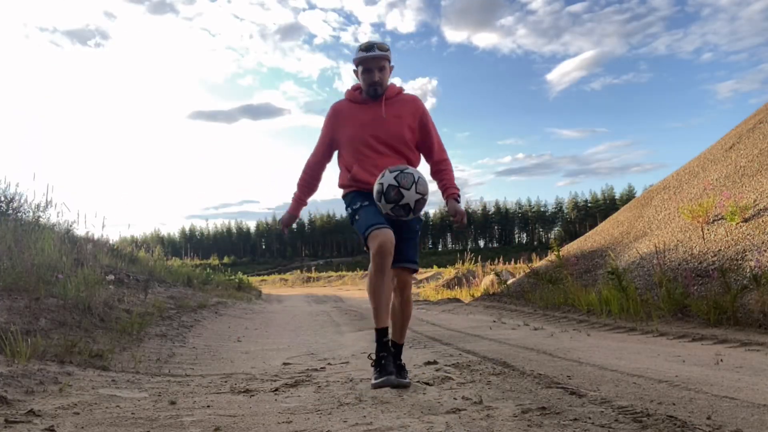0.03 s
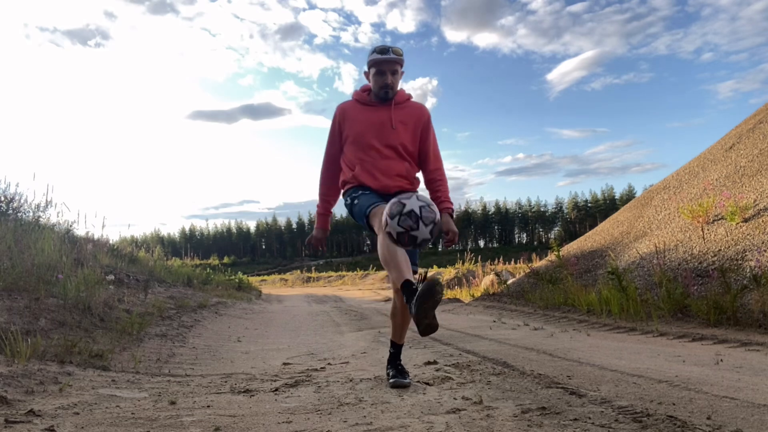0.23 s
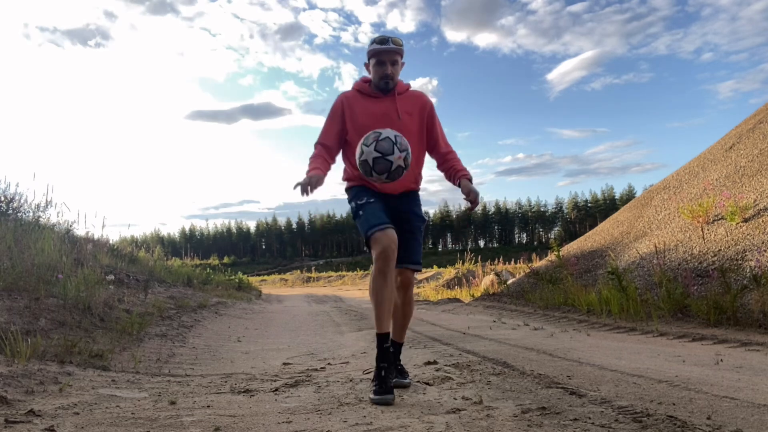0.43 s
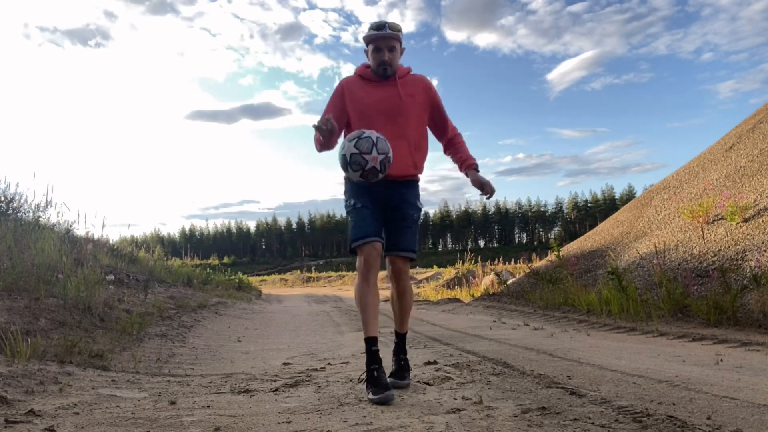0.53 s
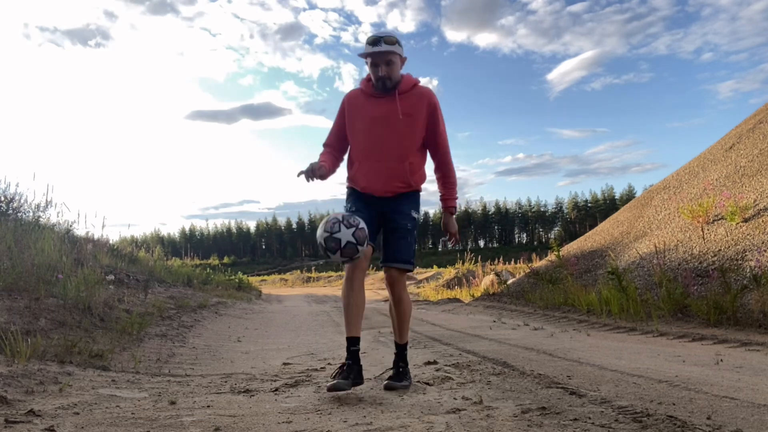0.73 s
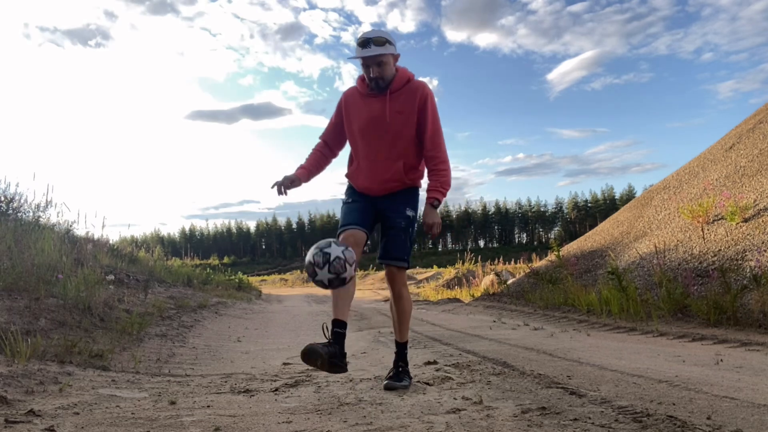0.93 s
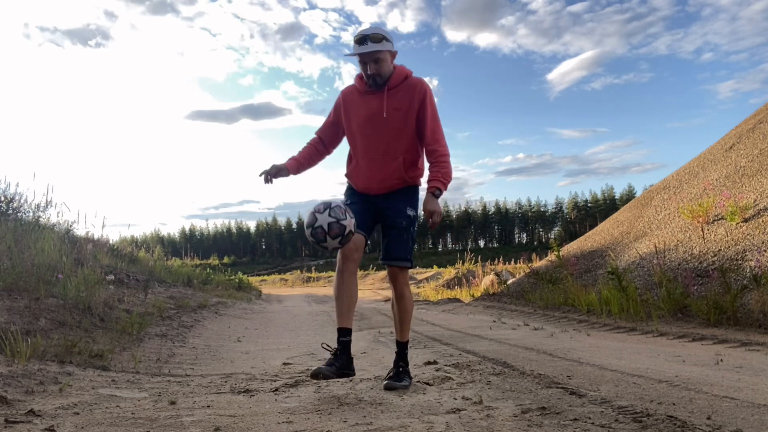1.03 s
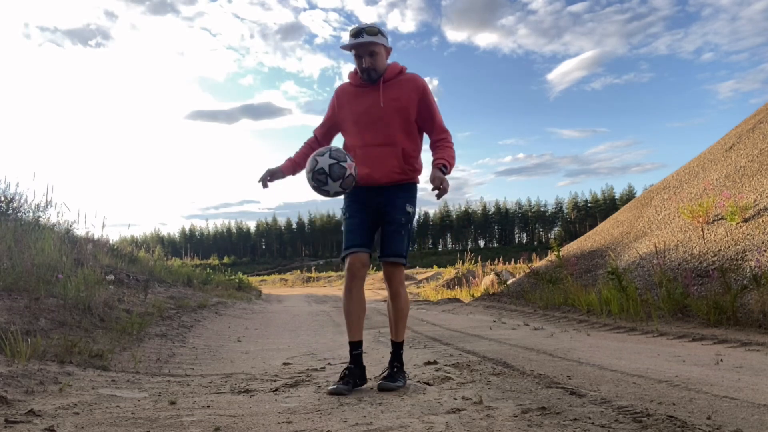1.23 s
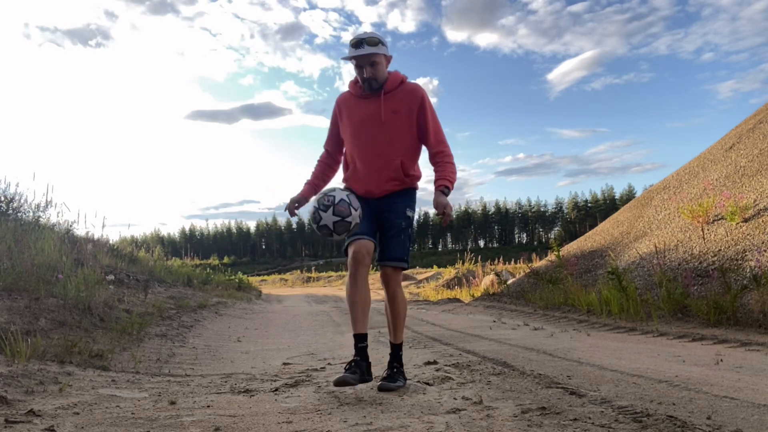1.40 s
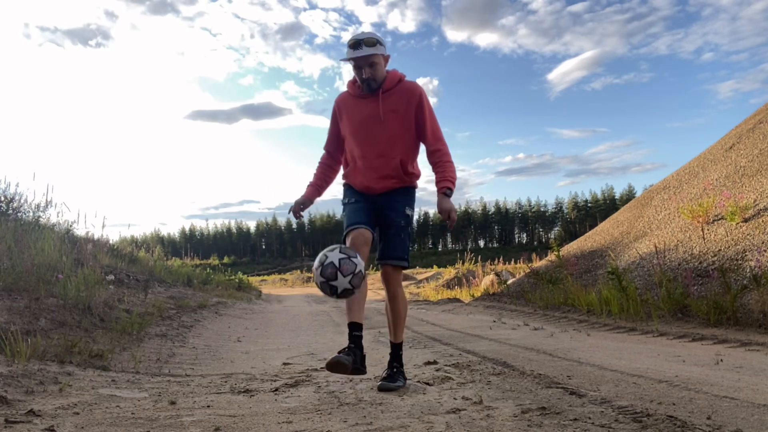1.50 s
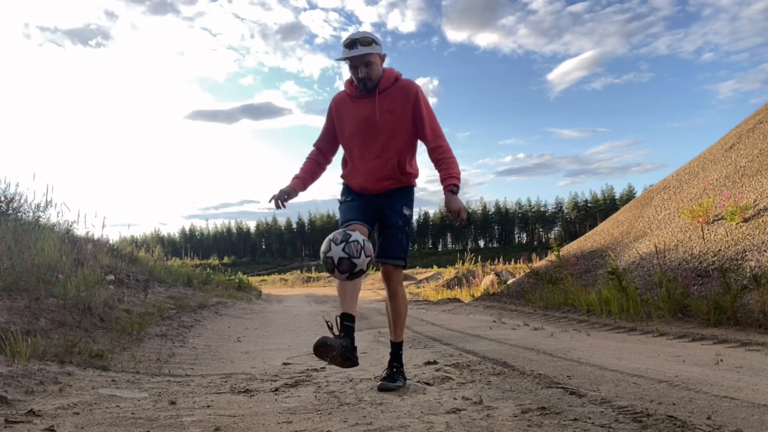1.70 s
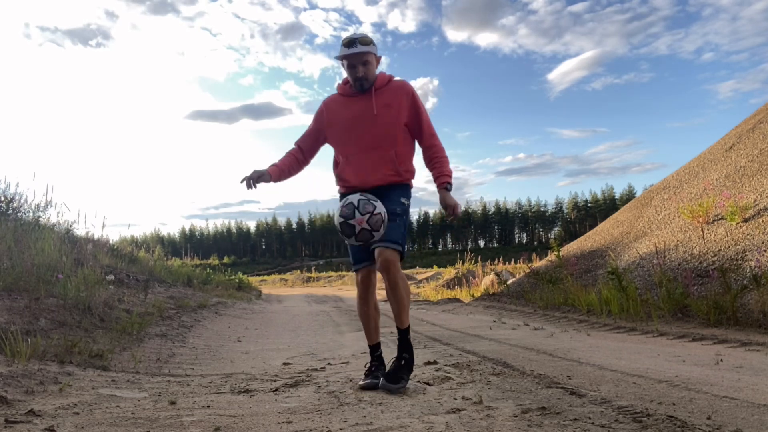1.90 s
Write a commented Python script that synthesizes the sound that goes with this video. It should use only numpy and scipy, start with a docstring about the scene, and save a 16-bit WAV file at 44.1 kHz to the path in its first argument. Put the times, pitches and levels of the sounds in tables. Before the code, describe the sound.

A football thumps five times at an uneven pace as someone juggles it on an open sandy track, a few metres from the microphone. Gritty shoe scuffs, sharp little taps and a tiny metallic jingle fall between touches, over faint wind.

```python
"""A sandy track in the open: a football is juggled on knees and shoes a few metres away.
Each touch slaps the cover and dents the ball: a knock, then heavily damped low modes that
come later the lower they are. Shoes scuff the sand and tap on stones, grit ticks and a small
metal piece jingles on the clothes, over light wind and a faint distant drone."""
import sys
import numpy as np
from scipy import signal
from scipy.fft import rfft, irfft
from scipy.io import wavfile

SR = 44100
rng = np.random.default_rng(int(sys.argv[2]) if len(sys.argv) > 2 else 0)


def file_out(sig):
    """Save sig as 16-bit WAV at sys.argv[1]."""
    # one column per channel
    cols = np.atleast_2d(sig).T
    # limit, then scale
    lim = np.clip(cols, -1, 1)
    pcm = np.round(lim * 32767).astype(np.int16)
    wavfile.write(sys.argv[1], SR, pcm)


N = 85995
T = np.arange(N) / SR
HZ = np.maximum(np.arange(N // 2 + 1) * SR / N, 1)


def amp(db):
    """Decibels to gain."""
    return 10 ** (np.asarray(db) / 20)


def unit(x):
    """Scale to rms 1."""
    return x / np.std(x)


def noise(spectrum, grain_db=0):
    """Noise shaped by (Hz, dB) points; grain_db makes it gritty."""
    hz, db = np.array(spectrum).T
    white = rng.standard_normal(N) * amp(grain_db * rng.standard_normal(N))
    gain = amp(np.interp(np.log(HZ), np.log(hz), db))
    return unit(irfft(rfft(white) * gain, N))


def band(hz, width_hz):
    """Noise in one steep resonance."""
    detune = (HZ - hz * hz / HZ) / width_hz
    return unit(irfft(rfft(rng.standard_normal(N)) / (1 + detune ** 2), N))


def drift(hz):
    """Smooth random motion below hz, rms 1."""
    return unit(irfft(rfft(rng.standard_normal(N)) / (1 + (HZ / hz) ** 4), N))


def highpass(x, hz, order):
    """Zero-phase high-pass."""
    return irfft(rfft(x) / (1 + (hz / HZ) ** order), N)


def age(start):
    """Seconds since start, zero before it."""
    return np.maximum(T - start, 0)


def swell(start, rise_s, fall_s, shape=1):
    """Attack and decay; a higher shape ends more abruptly."""
    t = age(start)
    return (1 - np.exp(-t / rise_s)) * np.exp(-(t / fall_s) ** shape)


def burst(source, envelope):
    """Enveloped noise, scaled to the energy of the envelope."""
    x = source * envelope
    return x * np.sqrt(np.sum(envelope ** 2) / (np.sum(x ** 2) + 1e-18))


def ring(modes, start):
    """Damped modes struck at start."""
    t = age(start)
    return sum(amp(db) * np.sin(2 * np.pi * hz * t) * np.exp(-np.log(1000) * t / t60_s)
               for hz, db, t60_s in modes)


# wind spectrum (frequency [Hz], relative density [dB])
WIND_SPECTRUM = [(25, -42), (45, -4), (70, -1.5), (130, 1), (280, -1), (520, -5.5), (900, -14.5),
                 (2000, -23.5), (5000, -25), (10000, -31), (16000, -39)]
# low rush of the wind (time [s], level [dB])
RUSH_LEVELS = [(0, -50), (.6, -80), (1.1, -61.5), (1.5, -54), (1.95, -47.5)]
def wind():
    """Light, near-steady wind and a low rush that fades, then slowly rises."""
    rush = amp(np.interp(T, *np.array(RUSH_LEVELS).T)) * band(570, width_hz=670)
    breeze = amp(-48.5 + 0.6 * drift(hz=6)) * noise(WIND_SPECTRUM)
    return breeze + rush


def drone():
    """Faint distant tone, wavering in pitch and level."""
    pitch_hz = 174.3 + 1.33 * drift(hz=3.47)
    rms_db = -55.5 + 1.5 * drift(hz=2.8)
    return amp(rms_db) * np.sqrt(2) * np.sin(2 * np.pi * np.cumsum(pitch_hz) / SR)


# shoe scuffs (peak time [s], level [dB], rise [s], fall [s])
SHOE_SCUFFS = [(.008, -42.5, 0.04, 0.026), (.085, -55.5, 0.028, 0.098), (.375, -52.5, 0.1, 0.034),
               (.475, -45, 0.016, 0.029), (0.563, -45.5, 0.029, 0.013), (.622, -34, 0.016, 0.0076),
               (0.678, -44.5, 0.019, 0.018), (0.786, -38.5, 0.02, 0.024), (1.251, -39.5, 0.015, 0.045),
               (1.363, -54.5, 0.028, .04), (1.790, -55.5, 0.032, 0.027), (1.865, -31.5, 0.016, 0.013),
               (1.918, -43.5, 0.031, 0.018)]
# sand spectrum (frequency [Hz], relative density [dB])
SAND_SPECTRUM = [(40, -38), (200, -4), (500, -10.5), (1250, -2), (2300, -5.5), (4500, -8), (8000, -13.5),
                 (12700, -22), (16000, -27)]
def scuffs():
    """Sand grains crunch as the shoes shift."""
    pressure = sum(amp(db) * np.exp(-np.maximum(peak - T, 0) / rise_s - age(peak) / fall_s)
                   for peak, db, rise_s, fall_s in SHOE_SCUFFS)
    return pressure * noise(SAND_SPECTRUM, grain_db=4) * amp(1.8 * drift(hz=330))


# metal contacts (time [s], level [dB], decay [s], brightness [dB])
METAL_CONTACTS = [(0.0563, -36.5, 0.0014, -7.5), (0.1354, -33.5, 0.0028, -5.5), (0.149, -41, 0.0015, 0),
                  (0.63, -63.5, 0.093, 7.5), (0.711, -52.5, 0.024, -12), (0.756, -42, 0.0043, 9),
                  (.7678, -28, 0.0014, -3), (0.7709, -17, 0.0032, -1), (0.776, -24, 0.003, -3),
                  (.7890, -33.5, 0.0052, 2), (0.814, -42, 0.0023, 0), (0.8254, -39.5, 0.0016, -7),
                  (1.235, -52, .001, -1), (1.3168, -34, 0.0049, -12), (1.3526, -42, 0.0023, -8),
                  (1.385, -45, 0.0026, -5)]
# scrape spectrum (frequency [Hz], relative density [dB])
SCRAPE_SPECTRUM = [(100, -45), (600, -50), (2200, 2), (4500, -5), (7000, 8.5), (10000, -6.5), (14000, -4.5),
                   (16000, -19)]
# metal modes, one list per column (frequency [Hz], gain [dB], t60 [s])
METAL_HZ = [6750, 6900, 7565, 7750, 8590, 11515, 12400, 13370, 13590, 13880]
METAL_DB = [-33, -27.5, -46, -26.5, -42, -36.5, -42, -37, -29, -25]
METAL_T60_S = [.045, .02, 0.018, 0.036, .03, 0.055, .045, 0.027, .04, 0.046]
def jingle():
    """Brief scraping contacts ring a small metal piece; some favour its highest modes."""
    scrape = noise(SCRAPE_SPECTRUM, grain_db=-5.5)
    treble = highpass(scrape, hz=9260, order=20)
    contact = 0
    for start, db, decay_s, bright_db in METAL_CONTACTS:
        low = burst(scrape - treble, swell(start, 0.00049, decay_s))
        high = burst(treble, swell(start, 0.00032, decay_s))
        contact += amp(db) * (low + amp(bright_db) * high) / np.sqrt(2)
    response = ring(zip(METAL_HZ, METAL_DB, METAL_T60_S), start=0)
    return amp(3.5) * contact + signal.fftconvolve(contact, response)[:N]


# taps of shoe and stones (time [s], body level [dB], resonance [Hz])
SHOE_TAPS = [(.0990, -34.5, 2310), (0.477, -26.5, 1960), (.7580, -27, 2160), (.7835, -26.5, 1400),
             (0.8155, -35, 1620), (0.928, -41, 3200), (1.0730, -34.5, 2480), (1.1331, -15, 2480),
             (1.1369, -18, 1160), (1.1585, -32, 2040), (1.2526, -26.5, 1700), (1.355, -34.5, 3300),
             (1.798, -34.5, 1410), (1.929, -30, 1190)]
def taps():
    """Dry taps: a short resonance and a bright crack that grows faster with force."""
    out, white = 0, rng.standard_normal(N)
    for start, db, hz in SHOE_TAPS:
        body = burst(band(hz, 0.97 * hz), swell(start, 0.0001, 0.0015))
        crack = burst(white, swell(start, 0.00005, 0.00057))
        out += amp(db) * body + amp(6.5 + 1.74 * db) * crack
    return out


def dent_mode(start, hz, swell_s, sag):
    """Heavily damped mode: swells, sinks from (1 + sag) * hz towards hz, dies in a few cycles."""
    t = age(start)
    cycles = hz * (t + sag * swell_s * (1 - np.exp(-t / swell_s)))
    envelope = t / swell_s * np.exp((1 - (t / swell_s) ** 2) / 2)
    return envelope * np.sin(2 * np.pi * cycles)


# ball touches (time [s], dent lag [s], thump [dB], body [dB], upper body [dB], body stretch [ratio],
#   knock [Hz], knock [dB], knock swell [s], clap [Hz], clap [dB],
#   slap [dB], slap decay [s], slap treble [dB], grit [dB], ring gain [dB])
BALL_TOUCHES = [(0.2023, 0.001106, -16.5, -16, -14, 1.36, 1110, -17.5, 0.0025, 1540, -20.5, -15.5, 0.0056, -9, -36.5, 2),
                (.4345, 0.00089, -31.5, -17.5, -20.5, 0.93, 1000, -13.5, 0.00052, 1538, -12, -14.5, 0.0019, 2, -34, -8),
                (0.8809, 0.0051, -16, -13, -18.5, 0.81, 643, -3, 0.00098, 890, -34, -19, 0.0045, 3, -37, -10),
                (1.0878, 0.00017, -38.5, -27, -24.5, 0.77, 958, -18.5, .0026, 2400, -27.5, -23, 0.0063, 0.5, -28, -27),
                (1.5905, 0.00049, -14.5, -14, -15.5, 0.78, 684, -11, 0.0022, 2150, -24, -16, 0.0022, 6.5, -35.5, -6.5)]
# spectra of cover slap and loose grit (frequency [Hz], relative density [dB])
SLAP_SPECTRUM = [(200, -15.5), (900, -1), (1700, -7), (2400, -9), (3400, -3.5), (4100, -2), (5100, -7),
                 (5900, -12), (7800, -12), (11000, -19.5), (16000, -29)]
GRIT_SPECTRUM = [(50, -30), (250, 3), (1200, 9.5), (2500, 4), (4000, 2.5), (8000, -4), (16000, -18)]
# ringing modes of the ball (frequency [Hz], relative level [dB], t60 [s])
BALL_MODES = [(219, -44, 0.21), (424, -41.5, 0.16), (740, -79, 0.18), (1215, -47, 0.24), (1475, -66, 0.19),
              (2330, -74, 0.15), (3340, -56, 1), (4000, -59, 0.53), (4700, -63, 0.27)]
def ball():
    """Each touch slaps the cover, shakes off grit and dents the ball, which shivers and rings."""
    slap = noise(SLAP_SPECTRUM)
    grit = noise(GRIT_SPECTRUM, grain_db=7.5)
    treble = highpass(slap, hz=6730, order=4)
    out = 0
    for (start, lag_s, thump_db, body_db, upper_db, stretch, knock_hz, knock_db, knock_s,
         clap_hz, clap_db, slap_db, slap_s, treble_db, grit_db, ring_db) in BALL_TOUCHES:
        contact = swell(start, 0.00032, slap_s, shape=0.93)
        out += amp(clap_db) * burst(band(clap_hz, 0.18 * clap_hz), contact)
        out += amp(slap_db) * burst(slap + (amp(treble_db) - 1) * treble, contact)
        out += amp(grit_db) * grit * swell(start, 0.0023, 0.022)

        dent = start + lag_s
        out += amp(knock_db) * dent_mode(dent, knock_hz, knock_s, sag=0.2)
        out += amp(upper_db) * dent_mode(dent, hz=404, swell_s=stretch * 0.0037, sag=0.27)
        out += amp(body_db) * dent_mode(dent, hz=208.7, swell_s=stretch * 0.0058, sag=0.32)
        out += amp(thump_db) * dent_mode(dent, hz=55.7, swell_s=0.013, sag=2.22)
        skin_shiver = burst(band(590, width_hz=530), swell(dent, 0.0031, 0.0096))
        out += amp(knock_db - 15) * skin_shiver
        out += amp(ring_db) * ring(BALL_MODES, dent)
    return out


# scatter spectrum (frequency [Hz], relative density [dB])
BANK_SPECTRUM = [(60, -20), (300, -10.5), (3000, -5.5), (16000, 10.5)]
def bank_scatter(direct):
    """Short, bright scatter from the sand banks."""
    response = noise(BANK_SPECTRUM) * swell(0, rise_s=0.0027, fall_s=0.02)
    response /= np.sqrt(np.sum(response ** 2))
    return signal.fftconvolve(direct, response)[:N]


def scene():
    """Player, faint scatter, wind and drone; mono."""
    player = scuffs() + jingle() + taps() + ball()
    return (player + amp(-23) * bank_scatter(player) + wind() + drone())[None]


def record(dry):
    """The microphone drops the deep bass and cuts the top."""
    low_hz, top_hz = 42, 16200
    bass_cut = signal.butter(2, low_hz, "high", fs=SR, output="sos")
    top_cut = signal.ellip(8, 0.2, 70, top_hz, fs=SR, output="sos")
    return signal.sosfilt(top_cut, signal.sosfilt(bass_cut, dry))


dry = scene()
out = record(dry)
file_out(out)
```